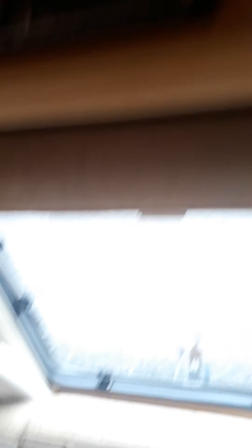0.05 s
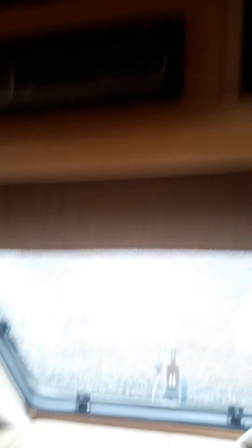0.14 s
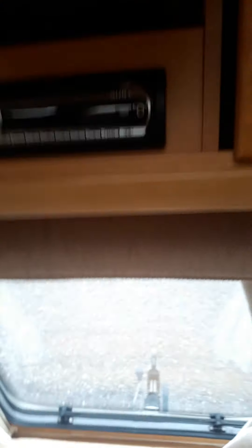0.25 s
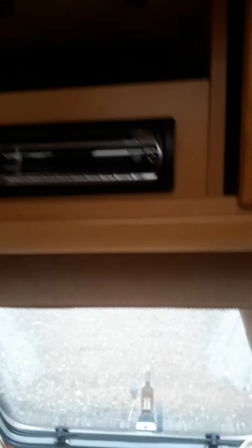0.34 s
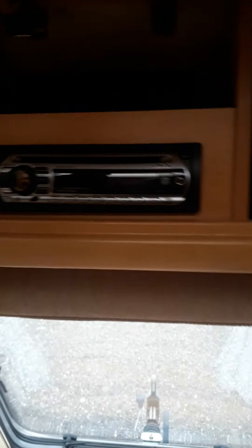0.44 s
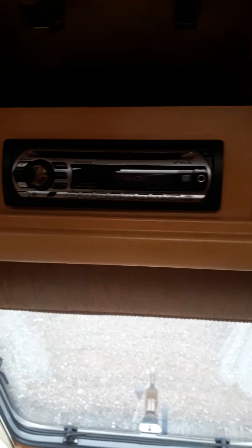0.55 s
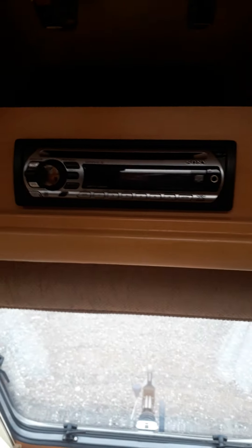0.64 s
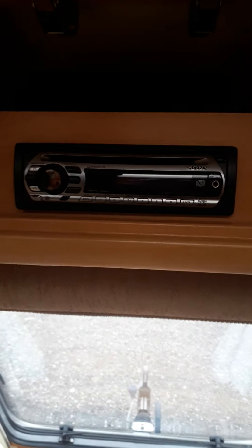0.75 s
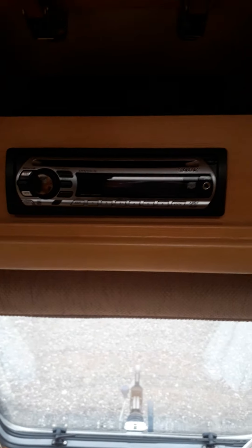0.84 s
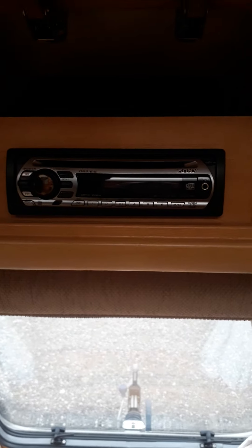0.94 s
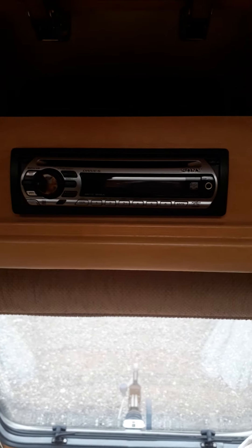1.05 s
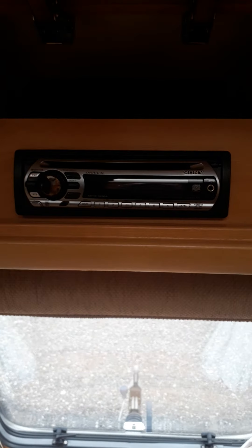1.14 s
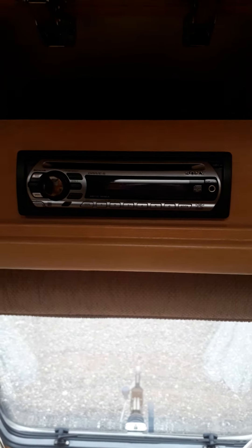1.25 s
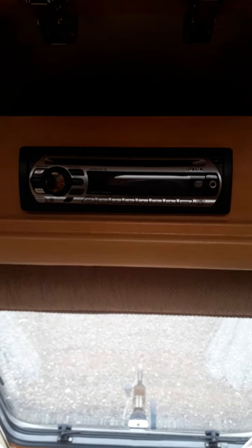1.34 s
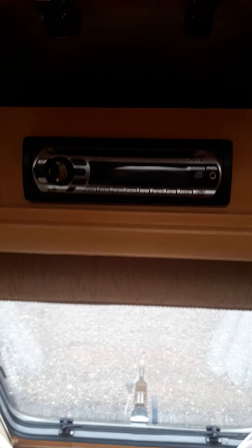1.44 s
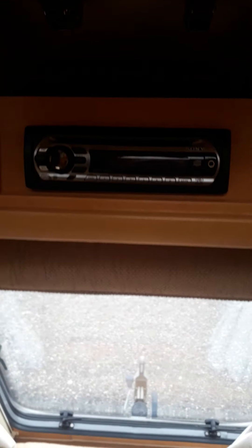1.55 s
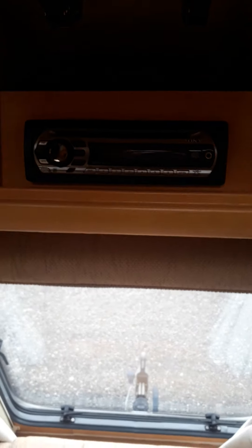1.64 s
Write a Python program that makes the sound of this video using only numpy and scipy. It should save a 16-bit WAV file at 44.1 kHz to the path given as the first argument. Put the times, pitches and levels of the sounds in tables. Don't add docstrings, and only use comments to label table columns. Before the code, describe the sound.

After a moment of quiet rumble and faint sleeve rustle, a small locker door knocks shut and its push-button catch snaps. Soft bumps and tiny ticks follow in a small padded cabin, heard close in stereo, duller on the right.

```python
import sys
import numpy as np
from scipy import signal
from scipy.fft import rfft, irfft, next_fast_len
from scipy.io import wavfile
from scipy.ndimage import uniform_filter1d

SR = 44100
rng = np.random.default_rng(int(sys.argv[2]) if len(sys.argv) > 2 else 0)


def gain_from_db(level_db):
    decades = np.asarray(level_db, float) / 20
    return 10 ** decades


def dump(signal):
    limited = np.clip(np.atleast_2d(signal).T, -1, 1)
    pcm = np.round(limited * 32767).astype(np.int16)
    wavfile.write(sys.argv[1], SR, pcm)


N = 74970


def curve(table, at, log=False):
    a = np.array(table, float)
    if log:
        return np.interp(np.log(at + 1), np.log(a[:, 0]), a[:, 1])
    return np.interp(at, a[:, 0], a[:, 1])


def colour(x, table, lag_s=0.):
    n = 2 * next_fast_len(x.shape[-1] // 2 + 2048)
    hz = np.arange(n // 2 + 1) * SR / n
    cepstrum = irfft(np.log(gain_from_db(curve(table, hz, True))), n)
    cepstrum = cepstrum * np.r_[1, np.full(n // 2 - 1, 2.), 1, np.zeros(n // 2 - 1)]
    response = np.exp(rfft(cepstrum) - 2j * np.pi * hz * lag_s)
    return irfft(rfft(x, n) * response, n)[..., :x.shape[-1]]


def unit(x):
    return x / np.sqrt(np.mean(x ** 2))


def band(hz, width_hz):
    f = np.arange(N // 2 + 1) * SR / N
    shape = 1 / (1 + ((f - hz) / (width_hz / 2)) ** 2) ** 2
    return unit(irfft(rfft(rng.standard_normal(N)) * shape, N))


def walk(rate):
    k = int(SR / rate)
    steps = np.repeat(rng.standard_normal(N // k + 1), k)
    return 1.3 * uniform_filter1d(uniform_filter1d(steps, k), k)[:N]


def decay(t, t60_s):
    return np.exp(-np.log(1000) * t / t60_s)


def ring(modes, gain, detune):
    hz, db, t60_s = np.array(modes, float).T[:, :, None]
    t = np.arange(4096) / SR
    sines = np.sin(2 * np.pi * hz * detune[:, None] * t)
    return (gain[:, None] * gain_from_db(db) * decay(t, t60_s) * sines).sum(axis=0)


def add(out, at_s, x):
    i = int(at_s * SR)
    out[..., i:i + x.shape[-1]] += x[..., :N - i]


# pitch [Hz], level [dB], time to die by 60 dB [s].
PANEL_MODES = [(83, -22, 0.05), (119.3, -6, 0.055), (175.8, 1, 0.033), (208, -5.5, 0.025),
               (334, -10, 0.046), (384, -7, 0.03), (563.6, -5.5, 0.03), (666, -9.5, 0.052), (758, 0, 0.033),
               (911, -11, 0.046), (1110, -15.5, 0.016), (1340, -9, 0.05), (1465, -6, .03)]


def strike_panel(blows, scatter_db, detune):
    out = np.zeros(N)
    chance = rng.standard_normal((len(blows), 2, len(PANEL_MODES)))
    for (at, db, contact_ms), (gain, shift) in zip(blows, chance):
        push_samples = 1.253 * contact_ms * SR / 1000
        push = np.sin(np.pi * np.clip(np.arange(SR // 50) / push_samples, 0, 1)) ** 2
        panel = ring(PANEL_MODES, gain_from_db(scatter_db * gain), 1 + detune * shift)
        add(out, at, -gain_from_db(db) * signal.fftconvolve(panel, push / push.sum()))
    return out


# start [s], level [dB], contact time [ms].
DOOR_KNOCKS = [(.2075, -34, 2), (.2125, -28, 2.1), (.2195, -21.5, 0.91), (.2215, -20, 0.73),
               (.2265, -17.5, 1.67), (.2315, -24, 0.72), (.2365, -32, 1.1), (.2435, -19.5, 2.66),
               (.2545, -44, 1.7), (.2775, -24.5, 2.776), (.294, -30, 0.57), (.306, -36.5, 1.7),
               (.318, -35, 2.8), (.339, -32, 3.1), (.352, -33, 1.71), (.366, -36.5, 3.16),
               (.38, -30.5, 4.2), (.424, -50, 0.92), (.432, -49.5, 2.17), (.452, -42, 5.3)]


def locker_door():
    return strike_panel(DOOR_KNOCKS, scatter_db=2, detune=0.01)


# start [s], level [dB], centre [Hz],
# fall away from the centre [dB per octave], left minus right [dB].
CATCH_CLICKS = [(.0144, -58, 2180, 15, -9.5), (.0957, -49, 11000, 3.5, 4), (.202, -41, 1990, 3, 10),
                (0.2057, -34.5, 7100, -3.5, 4), (0.2097, -28.5, 6950, 10.5, 6), (.2125, -31, 2110, 2, 0),
                (.2175, -42, 2100, 8, 0), (0.2212, -35.5, 6000, 12, 7), (.2265, -35, 2300, 5, 6),
                (.237, -34, 1400, 7, 6), (.2435, -37, 2300, 4, 0), (.2926, -15.5, 6000, 1.5, 2),
                (0.2936, -21, 2700, 4, -1), (.2956, -28.5, 3440, 9.5, 4), (.2975, -28.5, 3000, 8, 1.5),
                (.2995, -26, 3600, 6.5, -1), (0.3015, -28, 3600, 3.5, -4.5), (.3035, -36.5, 3500, 2.5, 4),
                (.3065, -40, 2000, 3, 1), (0.3152, -40, 2250, 10, 1), (.3455, -57, 2080, 21, 0),
                (.3501, -36.5, 2000, 21, 1), (.3535, -45.5, 2300, 9, -1), (.398, -43.5, 2170, 16, -9.5),
                (0.4978, -52.5, 2610, 2.5, 2), (0.5579, -52, 14000, 6, 3), (1.4019, -63.5, 2660, 19, 9),
                (1.446, -51.5, 6000, 5, 5), (1.4495, -59, 2200, 6.5, 0), (1.454, -56.5, 4135, 9, -2),
                (1.459, -65, 3940, 7, -3)]
# pitch [Hz], level [dB], time to die by 60 dB [s].
CATCH_MODES = [(552, 0.5, 0.042), (1282, 0, 0.021), (1640, -0.5, 0.025), (2054, -4.5, 0.016),
               (2350, -12, 0.011), (2570, 1, 0.0092), (2720, -8.5, 0.013), (3258, -2, 0.013),
               (3600, -4, 0.015), (4270, -8, 0.0066), (5580, -7, 0.0092), (6520, 2.5, 0.0074),
               (7730, 1, .006), (10040, -12, 0.0054)]


def catch():
    out, n = np.zeros((2, N)), len(CATCH_MODES)
    chance = rng.standard_normal((len(CATCH_CLICKS), 2, n + 2048))
    t = np.arange(2048) / SR
    alike = np.array(CATCH_MODES)[:, 0] < 1500
    for (at, db, hz, fall_db, pan_db), c in zip(CATCH_CLICKS, chance):
        detune = 1 + 0.012 * c[0, -n:]
        body = []
        for port in c:
            sign = np.sign(np.where(alike, c[0, :n], port[:n]))
            body.append(ring(CATCH_MODES, sign * gain_from_db(2 * port[:n]), detune)[:2048] / 3)
        crack = gain_from_db(2) * c[:, n:] * decay(t, 0.01164) / 2
        click = colour(np.array(body) + crack, [(hz / 16, -4 * fall_db), (hz, 0), (hz * 16, -4 * fall_db)])
        click = gain_from_db(db) * click / np.abs(click).max(axis=1, keepdims=True)
        add(out, at, click * gain_from_db(np.array([[pan_db], [-pan_db]]) / 2))
    return out


# time [s], level [dB].
SCRAPE_LEVEL = [
    (.198, -100),
    (.203, -48.5),
    (.212, -38.5),
    (.223, -36),
    (.235, -43),
    (.245, -43),
    (.256, -53),
    (.28, -66.5),
    (.33, -61),
    (.4, -110),
]
# frequency [Hz], level [dB].
SCRAPE_TONE = [(400, -14), (900, 2.5), (2100, -5.5), (3000, -9.5), (5000, -12.5), (9000, -16.5),
               (16000, -22.5)]
# centre [Hz], width [Hz], level [dB].
TONGUE_BANDS = [(2090, 280, 3), (1630, 200, -4.5), (2304, 130, -6)]


def scrape(t):
    grit = rng.standard_normal((2, N)) * gain_from_db(4 * walk(900))
    tongue = sum(gain_from_db(db) * np.array([band(hz, width), band(hz, width)]) for hz, width, db in TONGUE_BANDS)
    fade_at_s, fade_s = 0.21, 0.012
    tongue = tongue / (1 + np.exp(np.clip((t - fade_at_s) / fade_s, -20, 20)))
    return (unit(colour(grit, SCRAPE_TONE)) + tongue) * gain_from_db(curve(SCRAPE_LEVEL, t))


# start [s], level [dB], contact time [ms].
SOFT_BUMPS = [(.036, -56, 3.2), (.05, -49, 6.6), (.555, -60.5, 0.96), (.59, -46.5, 2.9), (.655, -50.5, 5.7),
              (.88, -58, 3.3), (.95, -57, 3.8), (1.362, -38, 4.9), (1.415, -42.5, 5.5),
              (1.5025, -51.5, 1.95), (1.533, -58.5, 1.3), (1.565, -59, 1.1), (1.64, -53, 2.3)]


def soft_bumps():
    return strike_panel(SOFT_BUMPS, scatter_db=3.1, detune=0.054)


# middle [s], level [dB], length [s], centre [Hz].
SCUFF_SWELLS = [(0.58, -62.5, 0.043, 770), (0.97, -65.5, 0.012, 1050), (1.376, -67.5, 0.072, 265),
                (1.54, -61.5, 0.058, 257), (1.548, -72.5, 0.097, 1160), (1.507, -55, 0.011, 157),
                (1.663, -67.5, 0.053, 283), (.11, -68.5, 0.027, 310), (0.015, -67.5, .02, 220),
                (1.2, -75, 0.014, 1200), (0.55, -65.5, 0.018, 148), (0.85, -62, 0.026, 98.7)]


def scuffs(t):
    out = np.zeros(N)
    for at, db, length_s, hz in SCUFF_SWELLS:
        swell = np.exp(-((t - at) / length_s) ** 2)
        out += gain_from_db(db + 3 * walk(150)) * band(hz, 0.7 * hz) * swell
    return out


# time [s], level [dB].
SLEEVE_LEVEL = [(0, -69.5), (.03, -73.5), (.1, -70.5), (.16, -75.5), (.5, -80.5), (1.33, -95.5),
                (1.45, -77), (1.55, -89)]


def sleeve(t):
    brush = np.array([band(3500, 30000), band(3500, 30000)])
    return brush * gain_from_db(3.7 * walk(59.3)) * gain_from_db(curve(SLEEVE_LEVEL, t))


# frequency [Hz], time to die by 60 dB [s].
CABIN_T60 = [(100, 0.35), (500, 0.3), (2500, 0.21), (7000, 0.23), (14000, 0.32)]


def room(x):
    t, tail = np.arange(SR // 2) / SR, 0
    onset = np.clip(t / 0.0009, 0, 1)
    for hz in 63 * 2 ** np.arange(0, 8.1, .5):
        mid, side = (band(hz, hz)[:len(t)] for _ in range(2))
        level = np.sqrt(hz) * min(hz / 170, 1) ** 2 / (1 + hz / 6000)
        fade = level * decay(t, curve(CABIN_T60, hz, True)) * onset
        tail = tail + fade * (mid + min(hz / 1800, 1) * side * np.array([[1], [-1]]))
    tail = tail / np.sqrt((tail ** 2).sum(axis=1).mean())
    return gain_from_db(-13) * signal.fftconvolve(x, tail, axes=1)[:, :N]


# frequency [Hz], level [dB per Hz].
RUMBLE_TONE = [(30, -5), (125, -4), (220, -9), (330, -11), (520, -20.5), (780, -17), (1250, -25),
               (1700, -42), (3200, -42)]
# time [s], level [dB].
RUMBLE_LEVEL = [(0, -62), (.15, -61.5), (.5, -63), (.75, -63), (.9, -64.5), (1.1, -63.5), (1.25, -63.5),
                (1.4, -62), (1.55, -64), (1.7, -66)]


def rumble(t):
    out = 0
    for hz in 32 * 2 ** np.arange(0, 6.7, 1 / 3):
        db = curve(RUMBLE_TONE, hz, True) + 10 * np.log10(hz) + 3.5 * walk(9.55)
        mid, side = band(hz, hz / 2), band(hz, hz / 2)
        out = out + gain_from_db(db) * (mid + min(hz / 890 + 0.017, 1) * side * np.array([[1], [-1]]))
    return unit(out) * gain_from_db(curve(RUMBLE_LEVEL, t))


# centre [Hz], width [Hz], level [dB].
MACHINE_BANDS = [(36.43, 5.4, -71), (76.5, 10, -69.5), (115, 7.1, -66), (752, 170, -76)]
# time [s], level [dB].
MACHINE_LOAD = [(0, -5.5), (.1, -2.5), (.5, -1.5), (.7, -0.5), (.8, -2.5), (.88, 1), (1.0, -3.5),
                (1.09, -6), (1.21, -7.5), (1.35, -1.5), (1.5, -4), (1.7, -1.5)]


def distant_machine(t):
    whir = sum(gain_from_db(db + 0.65 * walk(6.9)) * band(hz, width) for hz, width, db in MACHINE_BANDS)
    return whir * gain_from_db(curve(MACHINE_LOAD, t))


def scene():
    t = np.arange(N) / SR
    no_deep_bass = signal.butter(3, 94.5, "high", fs=SR, output="sos")
    panels = signal.sosfilt(no_deep_bass, locker_door() + soft_bumps())
    near = panels + catch() + scrape(t) + scuffs(t) + sleeve(t)
    return near + room(near) + rumble(t) + distant_machine(t)


# frequency [Hz], level [dB].
LEFT_TONE = [(6000, -0.5), (7550, 2.5), (9000, 2), (13500, 2.5), (16200, -12)]
# frequency [Hz], level [dB].
RIGHT_TONE = [(60, -4), (200, -2.5), (800, -2.5), (2500, 2), (4200, 6), (6300, 1), (8500, -25.5),
              (10000, -22), (12000, -11.5), (16000, -28)]
# frequency [Hz], level [dB per Hz].
LEFT_HISS = [(300, 7), (1500, 1), (3000, -3), (7000, -8.5), (13000, -5), (15700, -2.5), (15900, -43)]
# frequency [Hz], level [dB per Hz].
RIGHT_HISS = [(300, 2.5), (1500, 6.5), (3100, -1.5), (3900, 10), (4800, 0), (8000, -6.5), (13000, -0.5),
              (15700, -7), (15900, -47)]


def microphones(dry):
    ports = np.array([colour(dry[0], LEFT_TONE), colour(dry[1], RIGHT_TONE, lag_s=0.0002)])
    hiss = np.array([unit(colour(rng.standard_normal(N), tone)) for tone in (LEFT_HISS, RIGHT_HISS)])
    return ports + hiss * gain_from_db(-74)


def roll_off(x):
    return signal.sosfilt(signal.butter(12, 16820, fs=SR, output="sos"), x)


def record(dry):
    top_cut = signal.ellip(8, .2, 70, 16400, fs=SR, output="sos")
    mix = signal.sosfilt(top_cut, microphones(dry))
    return roll_off(mix)


dry = scene()
out = record(dry)
dump(out)
```